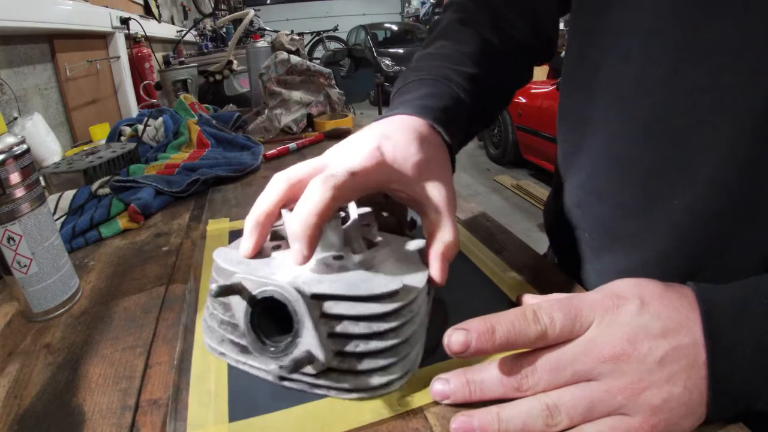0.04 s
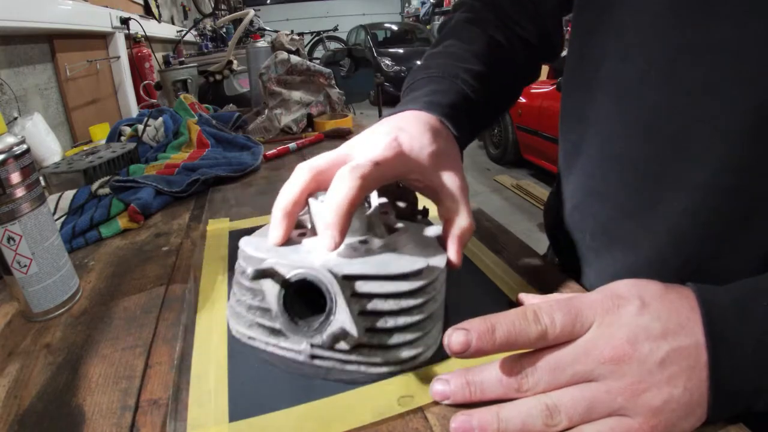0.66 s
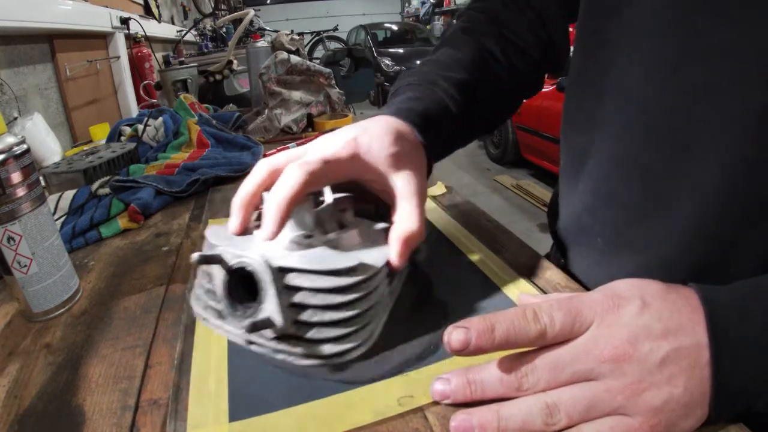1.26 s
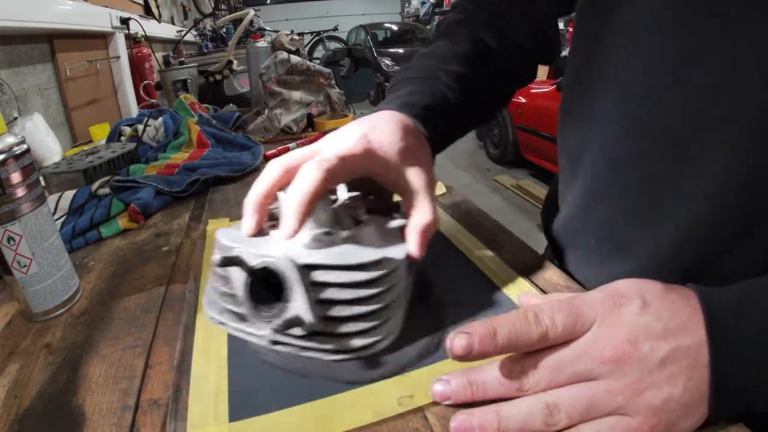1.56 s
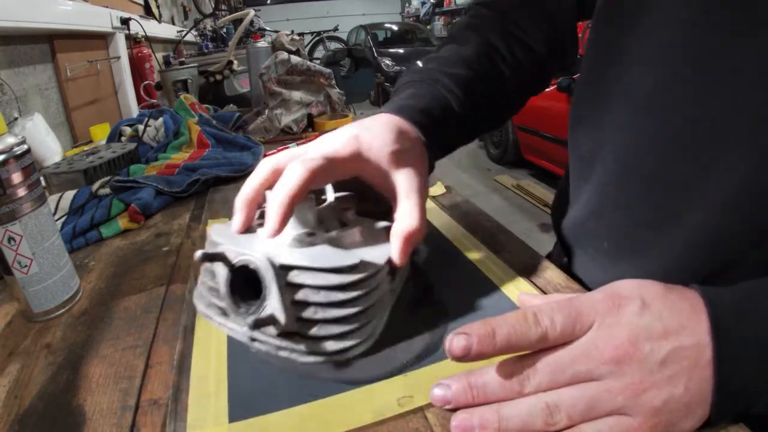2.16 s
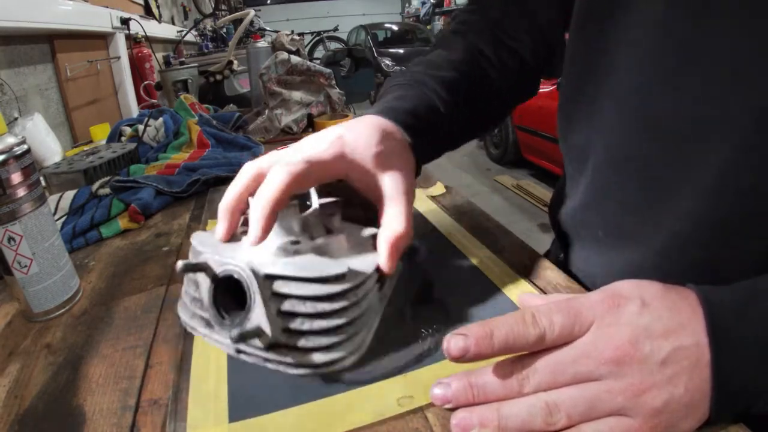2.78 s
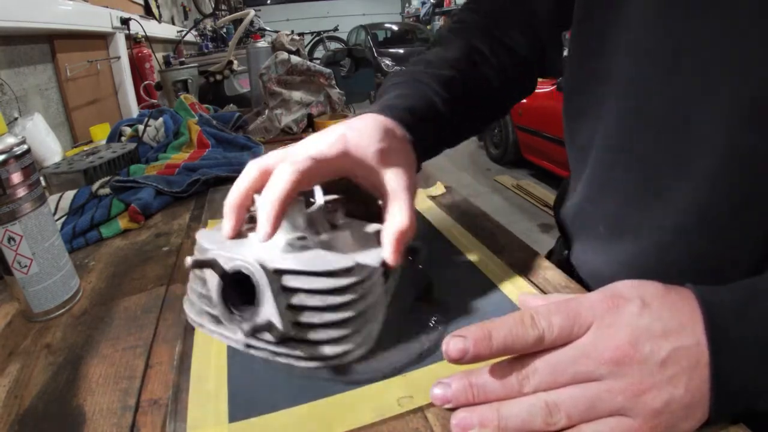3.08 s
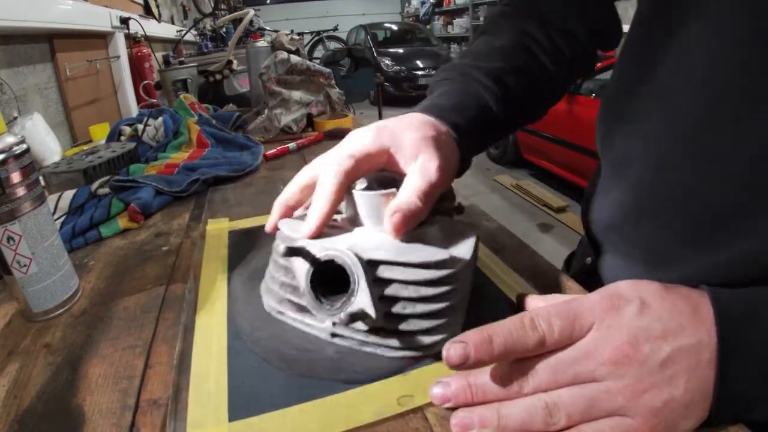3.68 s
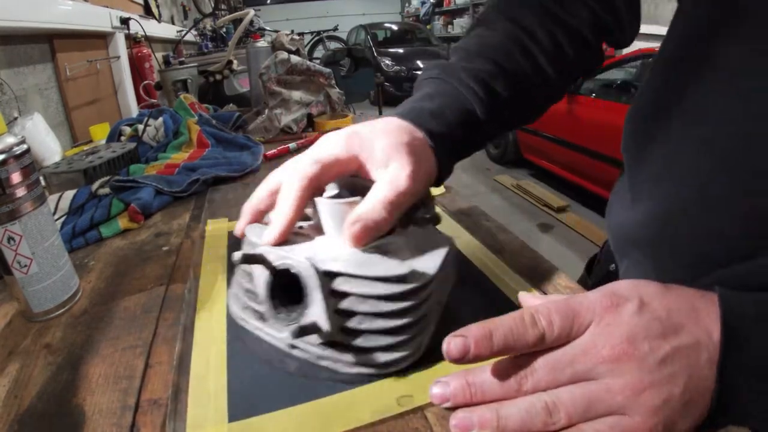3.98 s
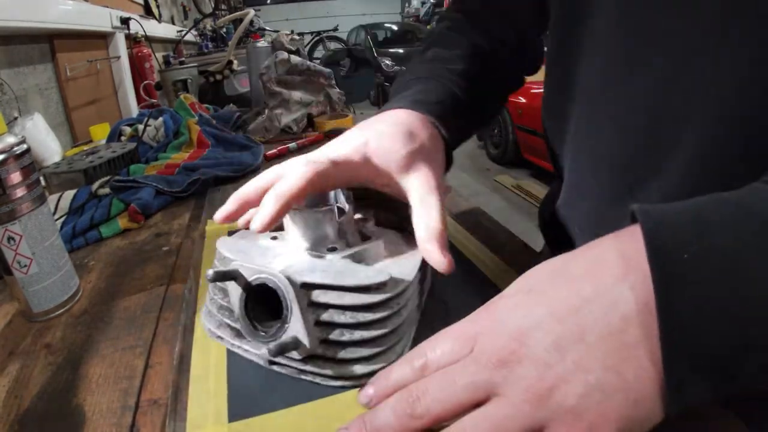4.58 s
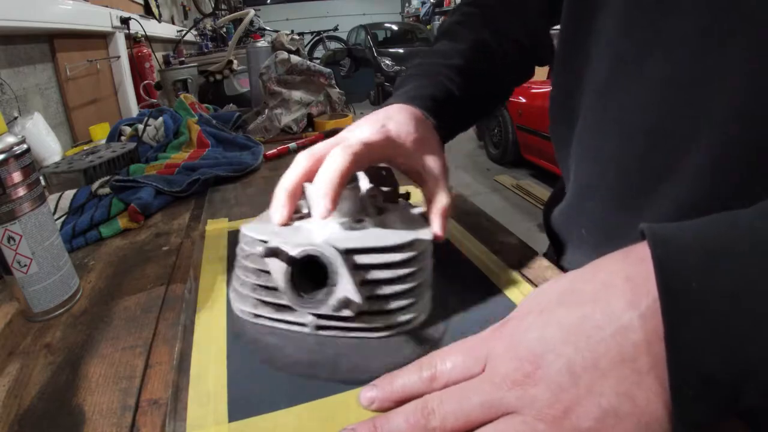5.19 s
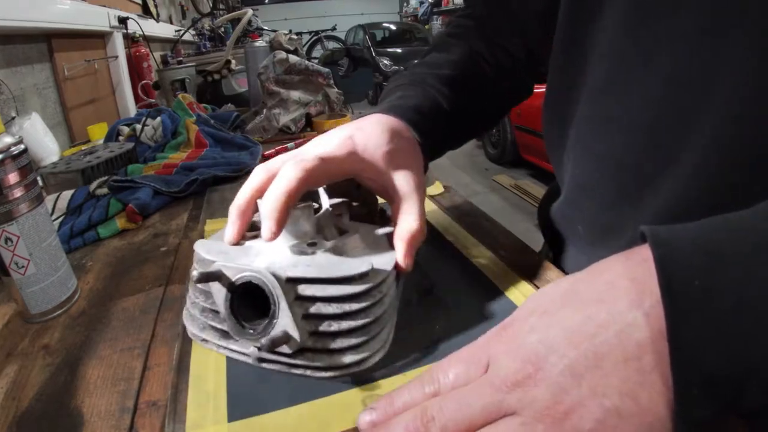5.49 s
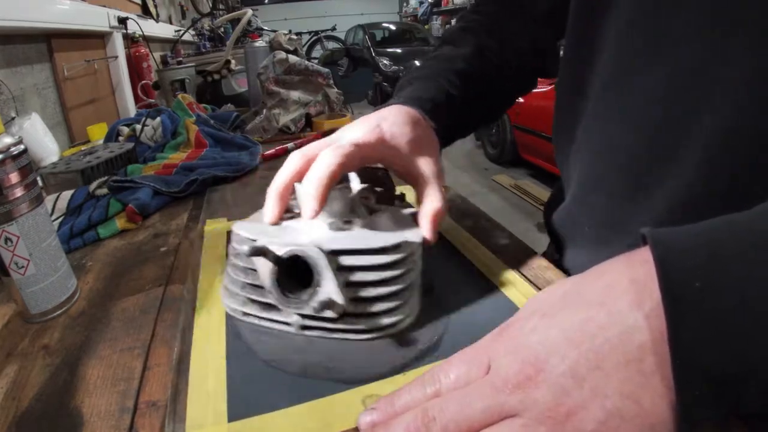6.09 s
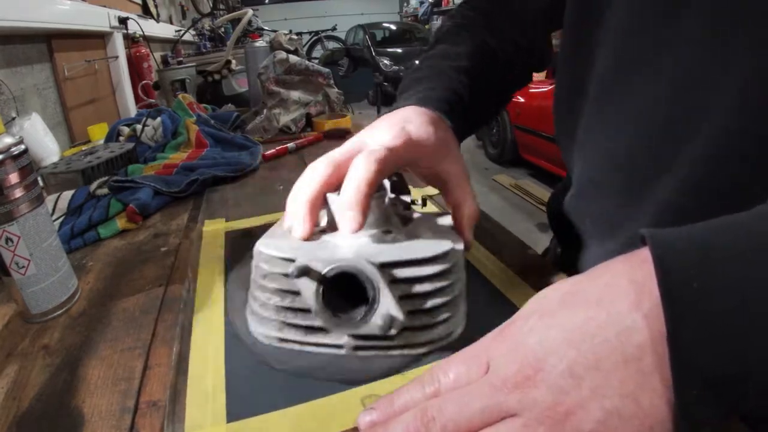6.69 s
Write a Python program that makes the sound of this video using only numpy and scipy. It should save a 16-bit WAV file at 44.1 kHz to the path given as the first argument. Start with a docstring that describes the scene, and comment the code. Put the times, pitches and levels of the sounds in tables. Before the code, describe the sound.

Close, gritty scraping of metal sanded on a wet abrasive sheet, broken by brief pauses and dull thumps on a workbench.

```python
"""In a quiet workshop, a finned aluminium cylinder head is lapped in circles on wet sandpaper, taped to a
glass plate on a wooden bench. Thousands of grit impacts a second excite the resonances of casting and
glass; this friction noise sinks wherever the stroke slows or sticks. When the wet face grabs, stick-slip
and rocking drive the damped modes of the bench, heard close by as judders and thumps."""
import sys
import numpy as np
from scipy import signal
from scipy.fft import rfft, irfft
from scipy.io import wavfile

SR = 44100
rng = np.random.default_rng(int(sys.argv[2]) if len(sys.argv) > 2 else 0)


def materialize(psi):
    """Save the field psi as 16-bit PCM at rate SR to the path in sys.argv[1].

    A 1-D psi becomes a single channel; in a 2-D psi each row is a channel.
    """
    bounded = np.clip(np.atleast_2d(psi).T, -1, 1)
    quanta = np.round(bounded * 32767).astype(np.int16)
    wavfile.write(sys.argv[1], SR, quanta)


N = 302085
TIME = np.arange(N) / SR
FREQ = np.maximum(np.fft.rfftfreq(N, 1 / SR), 1)
TOP_HZ = 15100


# how the face bears on the paper: t/s, plate drone/dB, casting ring/dB, brightness/dB
FACE_BEARING = [(0, 6.5, 5, .5), (.48, 6, 2, 1), (.68, 0.5, 5, 0), (.95, 1, 0, 1), (1.8, -1, 0, 1.5),
                (3.25, -4, -1.5, 2), (3.5, 0, -2.5, -2), (3.85, -3.5, -2.5, -2.5), (4.12, 1, -4.5, 1),
                (4.75, 3.5, 1, -0.5), (5.25, -0.5, -1, 1), (5.6, 0.5, -2, -1.5), (6.2, -1.5, 0, 1),
                (6.85, -1.5, 0, 3)]
def sanding(easy_db=-28):
    """Friction noise: grit excites the casting; hand speed sets the level, the bearing the spectrum."""
    stroke_db = hand()
    drone_db, ring_db, bright_db = curves(FACE_BEARING)
    # below an easy speed the hiss gives way to the plate's drone
    slow_db = np.clip(easy_db - stroke_db, 0, 8.5)
    drone_db += 0.9 * slow_db
    bright_db -= 0.12 * slow_db
    drag_db = 0.65 * walk(27) + 0.3 * walk(130)  # uneven drag makes the hiss flutter
    force = grit(grains_per_s=22000, spread_db=1.27) * undb(drag_db)
    hiss = unit(shifting_contact(casting(force), low_db=1.84, high_db=1.5, rate_hz=12.6))
    drone = shape(hiss, rolloff(FREQ / 1100)) * (undb(drone_db) - 1)
    ring = shape(hiss, rolloff((FREQ - 2600) / 170)) * (undb(ring_db) - 1)
    treble = shape(hiss, 1 - rolloff(FREQ / 4500)) * (undb(bright_db) - 1)
    level_db = stroke_db + grabs() + dropout()
    return wavering(*(hiss + drone + ring + treble) * undb(level_db))


def grit(grains_per_s, spread_db):
    """Shot noise: grains catch and let go at random, most tiny, a few coarse. Rows: mid, side."""
    caught = rng.random(N) < grains_per_s / SR
    size = undb(spread_db * np.minimum(rng.exponential(size=N), 5))
    return unit(caught * size * rng.standard_normal((2, N)))


# resonances of casting and glass: f/Hz, bandwidth/Hz, level over the broad spectrum/dB
CASTING_MODES = [(155, 20, 4.5), (220, 20, 7.0), (269, 25, 7.0), (425, 25, 6.0), (577, 75, 8.0),
                 (815, 55, 4.0), (1222, 95, 6.5), (1553, 155, 4.5), (1851, 185, 2.0), (2480, 190, 2.5),
                 (2692, 135, 3.0), (3404, 265, 3.0), (3962, 245, 4.0), (4819, 200, 4.0), (5440, 255, 5.5),
                 (5691, 175, 2.5), (6205, 100, 4.5), (6454, 125, 4.0), (8521, 390, 3.0), (9143, 205, 4.5),
                 (9941, 270, 4.0)]
# broad spectrum of the scratching: f/Hz, relative level/dB
SCRATCH_SPECTRUM = [(40, -32), (115, -30.5), (180, -13.5), (335, -17.5), (720, -16), (1000, -10),
                    (1600, -3.5), (2600, 0), (4400, -4.5), (6050, -6), (6950, -14), (9300, -17),
                    (10900, -33), (15000, -41.5)]
def casting(force):
    """Forced vibration: head and glass respond most strongly near their natural frequencies."""
    resonances = sum((undb(db) - 1) / (1 + 1j * (FREQ / hz - hz / FREQ) * hz / width)
                     for hz, width, db in CASTING_MODES)
    return shape(force, colour(SCRATCH_SPECTRUM) * (1 + resonances))


def shifting_contact(x, low_db, high_db, rate_hz, bands=36):
    """Modal coupling: as the bearing spots wander, groups of modes swell and fade independently."""
    place = np.interp(np.sqrt(FREQ), np.sqrt([400, TOP_HZ]), [0, bands - 1])
    spectrum, out = rfft(x), 0
    for k, depth_db in enumerate(np.linspace(low_db, high_db, bands)):
        share = np.maximum(1 - abs(place - k), 0)
        out = out + irfft(spectrum * share, N) * undb(depth_db * walk(rate_hz))
    return out


# runs of the hand between halts: start/s, end/s, rise constant/s, gain/dB
HAND_STROKES = [(-.1, 0.026, .02, 0), (.123, 3.54, 0.022, -0.5), (3.654, 4.354, 0.018, 0),
                (4.457, 4.482, .004, -9.5), (4.502, 4.53, .004, -5), (4.598, 4.646, 0.0035, 0),
                (4.726, 4.76, .002, -17), (4.768, 5.566, .01, 0), (5.612, 7.04, .006, 0)]
# effort of the hand, two slow pushes and then circling: t/s, level/dB
HAND_EFFORT = [(0, -29.5), (.29, -26.5), (.39, -31.5), (.5, -33.3), (.65, -22.3), (.94, -24.8),
               (1.27, -22.8), (1.34, -27.5), (2.1, -26.4), (3.44, -25.3), (3.8, -25.2), (4.06, -28.2),
               (4.28, -27.5), (4.33, -25), (4.52, -27.5), (5.1, -29.3), (5.9, -28.5), (6.85, -28.4)]
# slowings at turns of the circle: t/s, depth/dB
HAND_TURNS = [(1.52, 2), (4.856, 5), (5.361, 3.5), (5.793, 4.5), (5.932, 6), (6.068, 5.2), (6.602, 4)]
def hand(stop_s=0.0089, creep_db=-35.5, turn_s=0.021, bite_db=1.05):
    """Friction noise grows with sliding speed: its level in dB follows strokes, turns and judders."""
    moving = sum(undb(db) * ease((TIME - start) / rise) * ease((end - TIME) / stop_s)
                 for start, end, rise, db in HAND_STROKES)
    slowing_db = bells([(s, turn_s, depth) for s, depth in HAND_TURNS], recovery=0.7)
    rasp_db = bells([(s, half, bite_db) for s, half, _, _ in swells()])
    return curves(HAND_EFFORT)[0] + 20 * np.log10(moving + undb(creep_db)) - slowing_db + rasp_db


# a brief gap in the hiss: t/s, half length/s, depth/dB
HISS_GAP = [(1.253, 0.0035, 36)]
def dropout():
    """Amplitude modulation, in dB: the hiss drops out for an instant."""
    return -bells(HISS_GAP, recovery=1.15)


# spread of the hiss between the ears: t/s, side gain/dB
HISS_SPREAD = [(0, -49), (1.24, -45), (1.3, -4.5), (5.6, -5), (5.75, 4), (6.7, -1), (6.85, -7)]
def wavering(mid, side):
    """Interaural phase difference: where the ears fall out of step, the hiss thins in the middle."""
    spread = undb(curves(HISS_SPREAD)[0])
    in_phase, quadrature = swirl(mid, fall_hz_per_s=1700, width_hz=57, half_s=0.066)
    stereo = ports(mid - 0.25 * spread * in_phase, side * spread)
    return stereo + np.array([[1], [-1]]) * undb(-3) * spread * quadrature


def swirl(x, fall_hz_per_s, width_hz, half_s, count=170):
    """Time-varying filtering: brief narrow bands slide downward, in phase and in quadrature."""
    hz, t, cells = signal.stft(x, SR, nperseg=2048)
    mask = 0
    for when, height in rng.random((count, 2)):
        since = t - when * N / SR
        centre = 600 + 7400 * height ** 1.318 - fall_hz_per_s * since
        mask = mask + np.exp(-((hz[:, None] - centre) / width_hz) ** 2 - (since / half_s) ** 4)
    return [signal.istft(phase * cells * np.minimum(mask, 1), SR)[1][:N] for phase in (1, 1j)]


# the wet face grabs and breaks free: release/s, loss of hiss/dB, thump peak/dB
FACE_GRABS = [(1.989, 9, -18.5), (2.72, 7, -22), (3.018, 8, -26.5), (3.311, 7, -33), (6.395, 10, -37),
              (6.727, 10, -26)]
def grabs(offset_s=0.006, hold_s=0.012, lurch_s=0.013, lurch_db=2):
    """Static friction: the hiss, in dB, sinks while the face holds and overshoots as it lurches free."""
    held_db = bells([(s - offset_s, hold_s, depth) for s, depth, _ in FACE_GRABS], recovery=0.3)
    freed_db = bells([(s + offset_s, lurch_s, lurch_db) for s, _, _ in FACE_GRABS])
    return freed_db - held_db


# the head tips and drops onto the plate: t/s, peak level/dB, contact time/s
HEAD_DROPS = [(0.876, -23, 0.0024), (3.47, -23, 0.0035), (3.561, -11, 0.0015), (3.568, -15, 0.0069),
              (4.107, -23.5, 0.005), (4.183, -28, 0.0045)]
def knocks(release_contact_s=0.0064):
    """Impact excitation: the head strikes one blow as it drops or breaks free of a grab."""
    out = np.zeros(N)
    releases = [(s, db, release_contact_s) for s, _, db in FACE_GRABS]
    for s, db, contact_s in list(HEAD_DROPS) + releases:
        blow = bench(push(contact_s))
        add(out, s, undb(db) * blow / abs(blow).max())
    return out


# judders: first swell/s, last swell/s, half length of a swell/s, rms level/dB, slip rate/Hz
JUDDER_RUNS = [(.514, .514, 0.026, -30.5, 245), (.56, .56, .035, -33.5, 105), (.95, .95, .068, -38, 80),
               (1.28, 1.27, 0.015, -40.5, 126), (1.93, 1.95, 0.018, -42, 230),
               (2.022, 2.022, .018, -33.5, 99), (3.34, 3.54, .023, -39.5, 90), (4.108, 4.3, .022, -42, 105),
               (5.47, 5.48, .027, -39.5, 97), (5.6, 5.605, .028, -36.5, 96), (6.609, 6.609, .012, -40, 86)]
def swells(rock_s=0.068):
    """Rocking modulates a judder: one swell for each rock of the head."""
    return [(s, half, db, rate) for first, last, half, db, rate in JUDDER_RUNS
            for s in np.linspace(first, last, 1 + round(abs(last - first) / rock_s))]


def judders(jitter_cycles=0.247, scatter_db=3.0, slip_share=0.54):
    """Stick-slip oscillation: runs of uneven slips shove the bench; faster slips are sharper."""
    out = np.zeros(N)
    for s, half, db, rate in swells():
        reach_s = 2 * half
        late, size = rng.standard_normal((64, 2)).T
        when = (np.arange(-32, 32) + jitter_cycles * late) / rate
        strength = undb(scatter_db * size) * np.exp(-(when / half) ** 2)
        live = abs(when) < reach_s
        slips = np.zeros(int(2 * reach_s * SR) + 1)
        slips[((when[live] + reach_s) * SR).astype(int)] = strength[live]
        run = bench(signal.fftconvolve(slips, push(slip_share / rate)))
        run = highpass(run, 0.73 * rate)  # steady drag is silent: only the swing about it sounds
        rms = np.sqrt(np.sum(run ** 2) / (reach_s * SR))
        add(out, s - reach_s, undb(db) * run / rms)
    return out


def push(contact_s):
    """Force pulse cushioned by wet paper: the longer the contact, the narrower its spectrum."""
    t = TIME[:SR // 20] / contact_s
    return t ** 2 * np.exp(-3 * np.pi * t)


# modes of the bench under the plate: f/Hz, T60/s, relative level/dB
BENCH_MODES = [(66.7, 0.12, -3.5), (93, 0.056, -3.5), (137, 0.068, -8), (169, 0.044, 5.5), (204.5, 0.07, 1),
               (263, 0.1, -5), (550, 0.068, -24), (670, 0.066, -25), (813, 0.056, -10), (1330, .04, -1)]
def bench(force):
    """Modal superposition: the bench's impulse response is a sum of damped sinusoids."""
    t = TIME[:SR // 4]
    response = sum(undb(db) * np.cos(2 * np.pi * hz * t) * np.exp(-np.log(1000) * t / t60)
                   for hz, t60, db in BENCH_MODES)
    return signal.fftconvolve(force, response)


# still air of the workshop: f/Hz, relative level/dB
AIR_SPECTRUM = [(30, 2), (100, -7), (220, 0), (500, 2), (2000, -38), (6000, -28), (15000, -26)]
def workshop_air():
    """Ambient noise: a steady random signal, strongest at low frequencies."""
    return ports(*unit(shape(rng.standard_normal((2, N)), colour(AIR_SPECTRUM))))


# how unlike the two microphone ports hear: f/Hz, side gain/dB
PORT_WIDTH = [(350, -45), (600, -36), (3000, -59), (7000, -10.5), (8200, -5), (9500, -2.5), (12000, 3.5)]
def ports(mid, side):
    """Spatial coherence: left and right are alike in the bass and differ in the high treble."""
    return mid + np.array([[1], [-1]]) * shape(side, colour(PORT_WIDTH))


def undb(db):
    """Decibels to amplitude ratio."""
    return 10 ** (np.asarray(db) / 20)


def unit(x):
    """Normalisation to rms 1."""
    return x / np.sqrt(np.mean(x ** 2))


def curves(table):
    """Linear interpolation of each column in time."""
    s, *columns = np.transpose(table)
    return [np.interp(TIME, s, column) for column in columns]


def colour(points):
    """Frequency response through points of f/Hz, level/dB."""
    hz, db = np.transpose(points)
    return undb(np.interp(np.log(FREQ), np.log(hz), db))


def shape(x, gain):
    """Filtering by multiplication of the spectrum."""
    return irfft(rfft(x) * gain, N)


def rolloff(ratio):
    """Fourth-order slope, with gain 1/2 at ratio 1."""
    return 1 / (1 + ratio ** 4)


def highpass(x, hz):
    """Second-order attenuation below a cutoff."""
    return signal.sosfilt(signal.butter(2, hz, "high", fs=SR, output="sos"), x)


def walk(rate_hz):
    """Band-limited random fluctuation of rms 1."""
    return unit(shape(rng.standard_normal(N), np.exp(-(FREQ / rate_hz) ** 2)))


def ease(z):
    """Logistic step from 0 to 1."""
    return .5 + .5 * np.tanh(z / 2)


def bells(table, recovery=1):
    """Bell curves from rows of t/s, half length/s, height/dB; recovery is fall time over rise time."""
    return sum(db * np.exp(-((TIME - s) / np.where(TIME < s, half, half * recovery)) ** 2)
               for s, half, db in table)


def add(track, s, sound):
    """Superposition of a sound from time s."""
    start = max(int(s * SR), 0)
    track[start:start + len(sound)] += sound[:max(N - start, 0)]


def scene():
    """Superposition of scratching, thumps, judders and still air."""
    air = undb(-60.0) * workshop_air()
    return sanding() + knocks() + judders() + air


def record(dry):
    """Band limiting: the recorder cuts the deepest rumble and the top."""
    lowpass = signal.ellip(8, .2, 70, TOP_HZ, fs=SR, output="sos")
    return signal.sosfilt(lowpass, highpass(dry, 32))


dry = scene()
out = record(dry)
materialize(out)
```